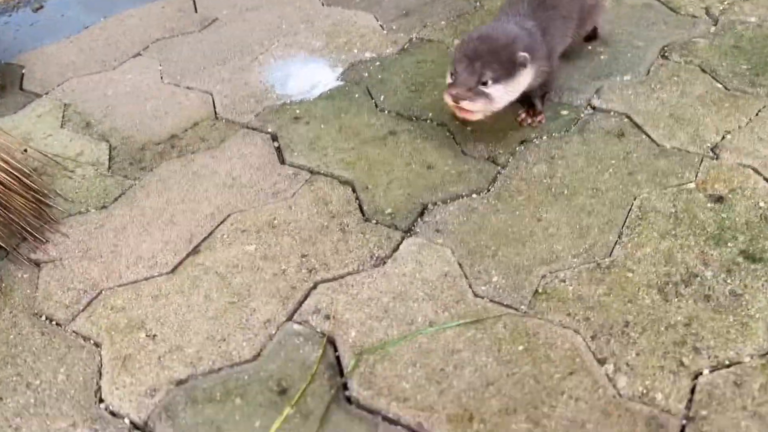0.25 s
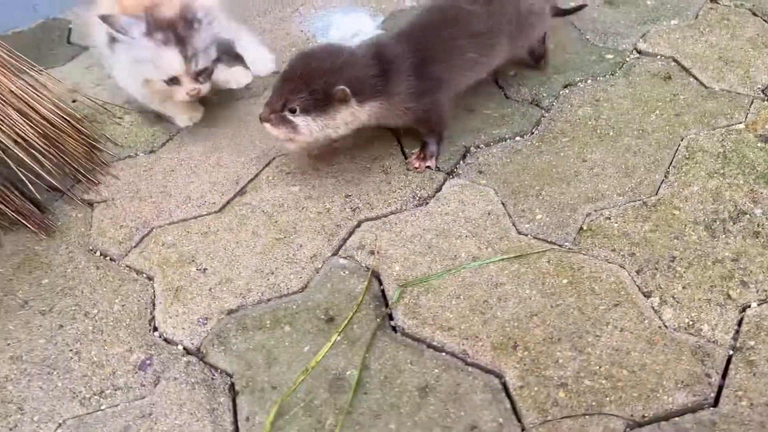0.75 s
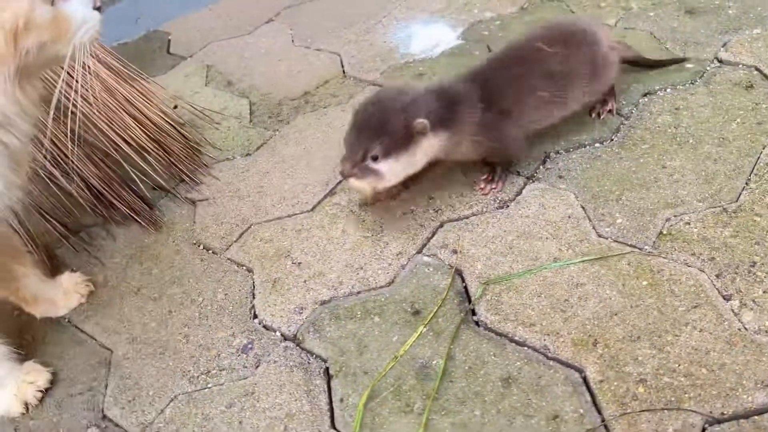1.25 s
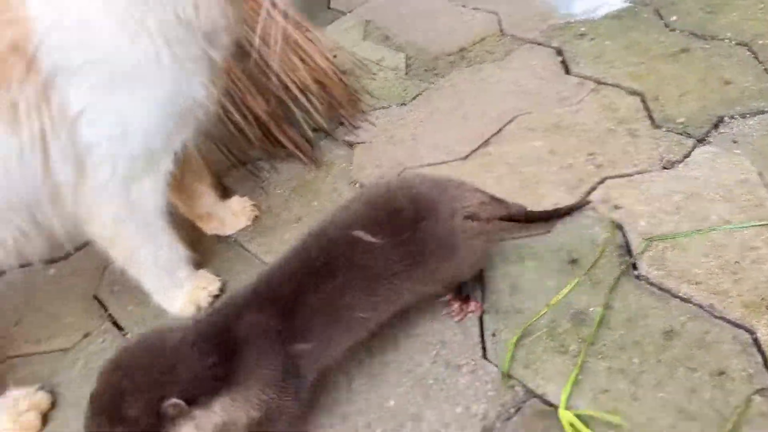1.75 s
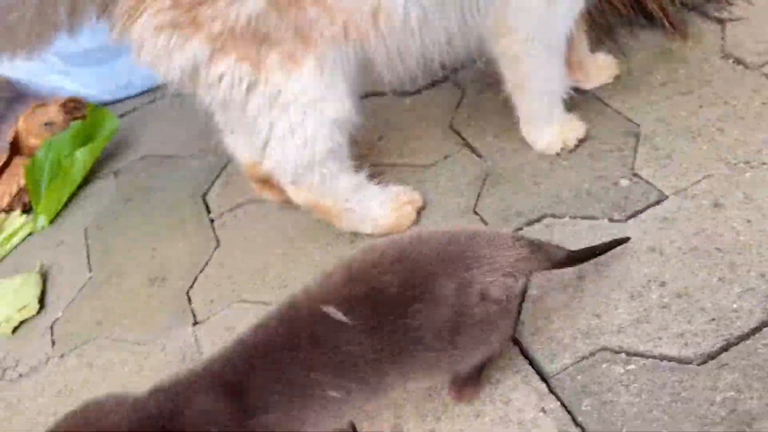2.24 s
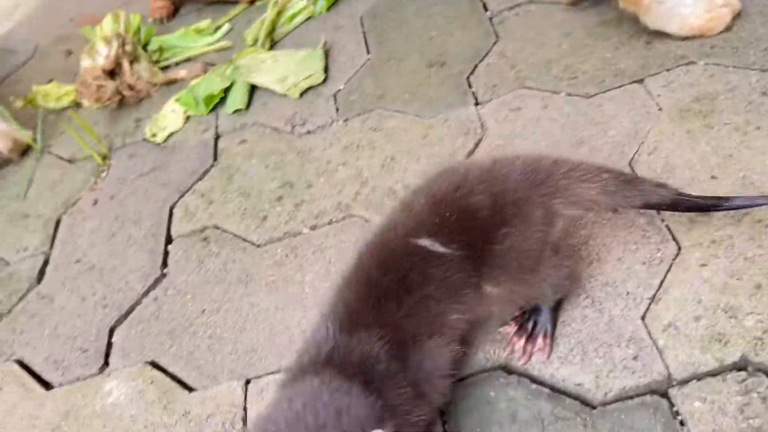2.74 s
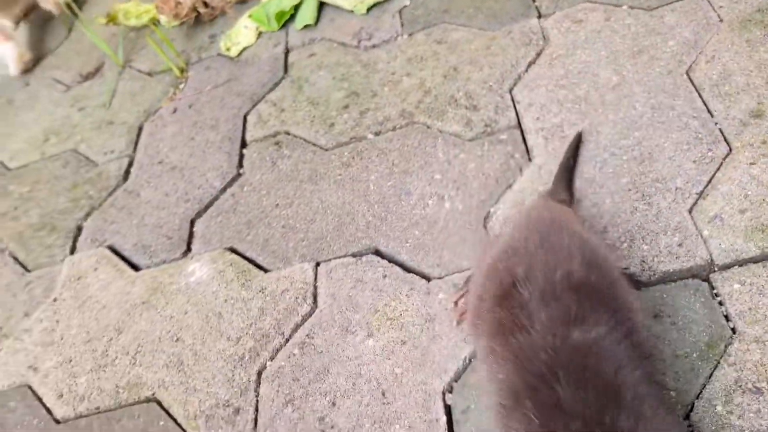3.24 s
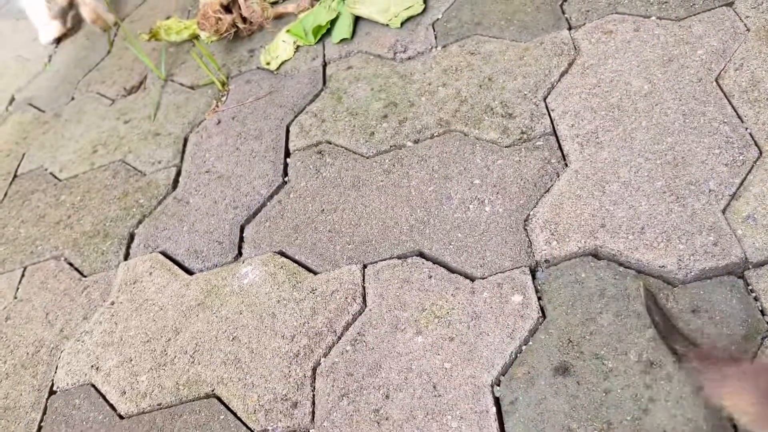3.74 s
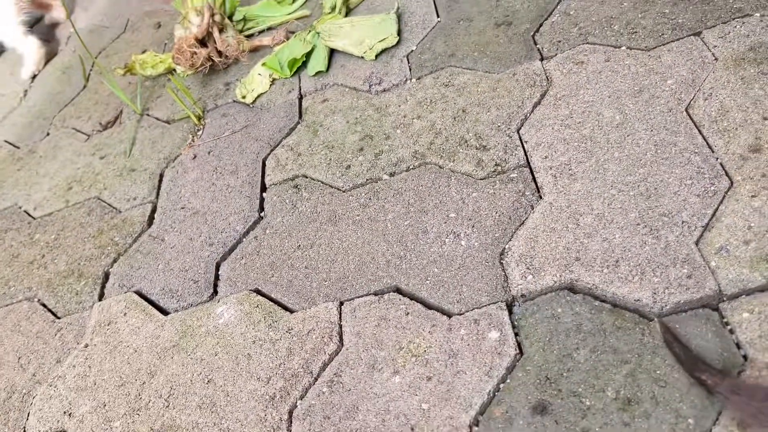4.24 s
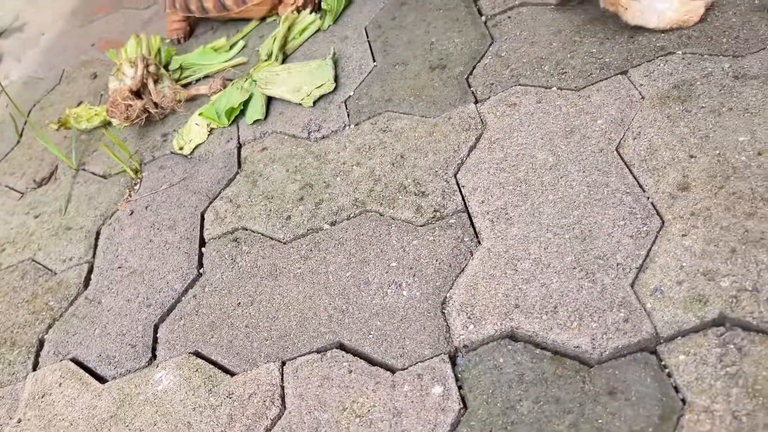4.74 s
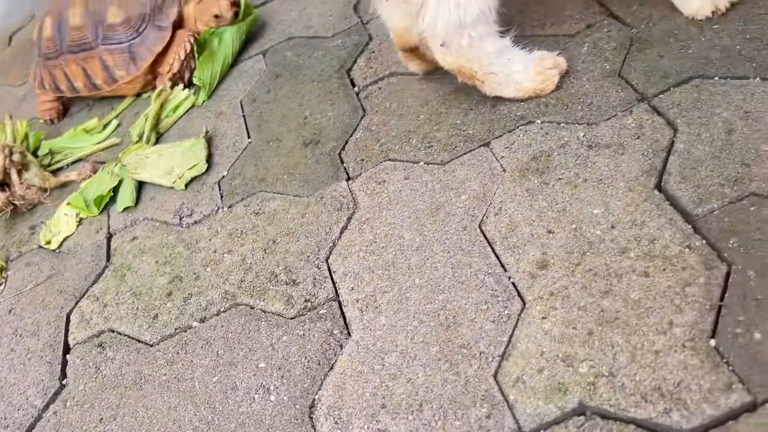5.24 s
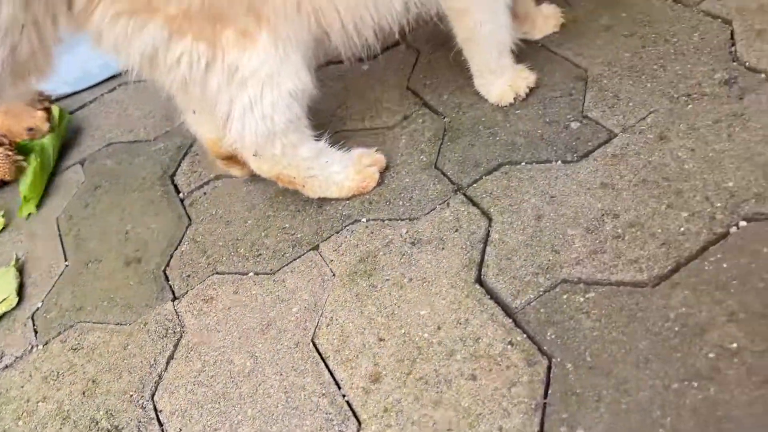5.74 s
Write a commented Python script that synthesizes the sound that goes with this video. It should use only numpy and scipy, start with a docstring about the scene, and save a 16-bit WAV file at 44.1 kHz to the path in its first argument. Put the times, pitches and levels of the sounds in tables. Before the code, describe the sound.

A baby otter gives six short, piercing chirps that slide downward, close by in a paved yard, over faint rumble and small taps.

```python
"""A low outdoor rumble, a far hum and a faint patchy wash (shaped noise and wavering sines) lie under a paved yard.
From the start there are short taps, soft pops, scuffs, rustles and grit close by: bands of noise that fade.
A baby otter chirps six times near the microphone, an arching sine with its octave that flutters and briefly dips;
stones and walls answer each chirp with echoes and a noise-like tail.
The rumble surges twice between the third and fourth chirps; the last chirp is softest, with most echo and ring."""
import sys
import numpy as np
from scipy import signal
from scipy.fft import rfft, irfft, next_fast_len
from scipy.io import wavfile
from scipy.ndimage import uniform_filter1d, minimum_filter1d

SR = 44100
rng = np.random.default_rng(int(sys.argv[2]) if len(sys.argv) > 2 else 0)


def master(y):
    """Save y as 16-bit WAV."""
    cut = np.clip(np.atleast_2d(y).T, -1, 1)
    pcm = np.round(cut * 32767)  # scale
    wavfile.write(sys.argv[1], SR, pcm.astype(np.int16))


N = 263718
EDGE_HZ = 16100  # upper band limit at the microphone


def amp(db):
    """Decibels to gain."""
    return 10 ** (np.asarray(db) / 20)


def unit(x):
    """Scales to rms 1."""
    return x / np.sqrt(np.mean(x ** 2) + 1e-20)


def read(points, hz):
    """Reads a table on a log-frequency axis."""
    f, value = np.transpose(points)
    return np.interp(np.log(hz + 1), np.log(f + 1), value)


def add(mix, s, sound):
    """Mixes a sound in at time s."""
    part = mix[max(round(s * SR), 0):][:len(sound)]
    part += sound[:len(part)]


def colour(x, gain):
    """Filters by a gain given as a function of frequency."""
    size = next_fast_len(len(x) + 1024)
    hz = np.fft.rfftfreq(size, 1 / SR)
    return irfft(rfft(x, size) * gain(hz), size)[:len(x)]


def noise(size, gain):
    """Coloured noise of rms 1."""
    return unit(colour(rng.standard_normal(size), gain))


def hump(hz, octaves):
    """A bell-shaped band on the octave scale."""
    return lambda f: 1 / (1 + (np.log2((f + 1) / hz) / octaves) ** 2) ** 2


def wander(size, rate_hz):
    """Smooth random motion of rms 1, up to about the given rate."""
    return noise(size, lambda f: np.exp(-(f / rate_hz) ** 2))


# Colour of the open air around the yard. Each row: frequency in Hz, relative density in dB.
AIR_COLOUR = [(15, -66.5), (25, -34.5), (59, -6.5), (87, -1.5), (120, -6), (195, -6.5), (416, -21.5),
              (476, -18), (531, -26), (1650, -25), (2990, -31.5), (3720, -31), (6050, -39), (11900, -41),
              (16000, -48)]
# Swells of the distant rumble. Each row: centre in seconds, rise in dB, half length in seconds.
RUMBLE_SURGES = [(1.74, 3.501, 0.14), (2.42, 3.5, .2)]
# Course of the faint wash. Each row: time in seconds, level in dB before the overall lift.
WASH_COURSE = [(0, -66), (.45, -67), (.75, -60.5), (1.15, -66.5), (2.2, -66), (2.5, -60.5), (3.05, -67),
               (3.45, -62.5), (4.25, -70), (5.15, -66), (5.4, -61.5), (5.98, -61)]
# Hum of a far machine. Each row: frequency in Hz, level in dB.
FAR_HUM = [(88, -64), (200, -67.5), (262, -69)]


def outdoors(rumble_db=-55.0, swell_db=0.73, wash_lift_db=1, split_hz=400, patchy_db=1.8):
    """Low noise makes the rumble, wavering sines the hum; octave bands swelling separately make the wash."""
    t = np.arange(N) / SR
    low = lambda f: 1 / np.sqrt(1 + (f / split_hz) ** 8)
    surge_db = sum(db * np.exp(-((t - s) / half_s) ** 2) for s, db, half_s in RUMBLE_SURGES)
    rumble = noise(N, lambda f: amp(read(AIR_COLOUR, f)) * low(f))
    rumble *= amp(rumble_db + surge_db + swell_db * wander(N, 4))
    wash = np.zeros(N)
    for octave in range(6):
        # overlapping bands an octave apart, all above the rumble
        overlap = lambda f: np.clip(1 - abs(np.log2((f + 1) / split_hz) - octave), 0, 1)
        band = lambda f: np.sqrt(overlap(f) * (1 - low(f) ** 2))
        hiss = colour(rng.standard_normal(N), lambda f: amp(read(AIR_COLOUR, f)) * band(f))
        wash += hiss * amp(patchy_db * wander(N, 12))
    wash = unit(wash) * amp(wash_lift_db + np.interp(t, *np.transpose(WASH_COURSE)))
    hum = sum(amp(db) * unit(np.sin(2 * np.pi * hz * t + 1.5 * wander(N, 7.8))) for hz, db in FAR_HUM)
    return rumble + wash + hum


# How long the yard rings. Each row: frequency in Hz, time to fall 60 dB in seconds.
YARD_DECAY = [(500, 0.02), (4000, 0.69), (6500, 0.667), (8500, 0.53), (12000, 0.63), (16000, 0.35)]
# Colour of that ring. Each row: frequency in Hz, relative level in dB.
YARD_TINT = [(500, -2), (3500, 0), (5000, -2.5), (6500, 0.5), (7500, -1), (8500, -1.5), (9500, 0.5),
             (12000, 1.5), (16000, 2)]


def yard(x, rise_s=.012):
    """The walls return a diffuse tail: noise that builds quickly and decays at its own rate in each band."""
    hz, t, bands = signal.stft(rng.standard_normal(SR), SR, nperseg=256)
    decay_db = -60 * t / read(YARD_DECAY, hz)[:, None]
    bands = bands * amp(read(YARD_TINT, hz)[:, None] + decay_db)
    tail = signal.istft(bands, SR, nperseg=256)[1]
    tail *= 1 - np.exp(-np.arange(len(tail)) / SR / rise_s)
    return signal.fftconvolve(x, tail / np.linalg.norm(tail))[:N]


def sand(per_s=22, softest_db=-66, spread_db=4.5, t60=.02):
    """Loose grit ticks faintly: short decaying noise bands at random times, pitches and strengths."""
    out, t = np.zeros(N), np.arange(1500) / SR
    for when, pitch, chance in rng.random((int(per_s * N / SR), 3)):
        tick = noise(len(t), hump(900 * 8 ** pitch, 1.1)) * amp(-60 * t / t60)
        # small draws, which are rare, make the loudest ticks
        add(out, when * N / SR, tick * amp(softest_db - spread_db * np.log(max(chance, .04))))
    return out


# Short taps and soft pops, some at the ends of chirps, with short dull low bursts near the end of chirp one
# and at chirp four. Each row: start in seconds, peak in dB, centre in Hz, time to fall 60 dB in seconds.
SHORT_TAPS = [(.076, -44.5, 1190, .03), (.153, -37, 500, .03), (0.234, -32, 900, .015),
              (.253, -26, 1300, .03), (0.283, -37, 2800, .03), (.42, -45.5, 2200, .025),
              (0.465, -46, 750, .04), (.518, -46, 1400, .025), (.691, -49, 9000, .015),
              (1.305, -46.5, 8000, .03), (1.903, -46, 5000, .02), (2.056, -47, 3000, .015),
              (2.113, -42.5, 4800, 0.019), (2.921, -29, 40, 0.06), (2.921, -27.5, 800, 0.031),
              (2.928, -26, 900, .025), (3.02, -34.5, 1800, .03), (3.483, -39, 1600, 0.013),
              (3.517, -36, 1500, .018), (3.815, -27, 3700, .012), (3.817, -35, 330, .035),
              (3.83, -35, 1700, .04), (3.977, -24, 2000, 0.022), (5.513, -39.5, 3000, 0.054),
              (5.918, -39.5, 2600, 0.022)]
# Scuffs and rustles, long low swells of rumble, and a breathy, ragged noise at the end of the last chirp.
# Each row: start in seconds, length in seconds, level in dB, centre in Hz, width in octaves.
FADING_NOISES = [(0.102, 0.24, -58, 1100, 0.46), (0.5, 0.5, -68, 800, 1.16), (1.489, 0.21, -63.5, 650, 1.2),
                 (1.66, 0.48, -64, 550, 0.9), (1.864, 0.4, -70.5, 7000, 1.5), (2.1, 1.78, -60.5, 170, 0.6),
                 (3.55, 0.9, -64, 190, 0.7), (2.378, 0.56, -55.5, 850, 1.4), (2.39, 0.47, -59, 2594, 1.9),
                 (2.41, 0.18, -61.5, 10000, 1.2), (3.271, 0.51, -62, 1900, 1.2),
                 (3.483, 0.13, -67, 10070, 1.35), (4.621, 0.3, -73, 2210, 1.22),
                 (4.96, 0.071, -68, 11100, 1.06), (5.182, 0.31, -72, 3600, 0.7),
                 (5.352, 0.15, -66.5, 8030, 2), (5.5, 0.11, -56, 5980, 2.8),
                 (5.849, 0.14, -56.5, 4200, 0.89)]


def small_sounds(tap_octaves=1.6, grit=.25):
    """Taps and pops are decaying noise bursts; scuffs, rustles and swells are gritty bands that rise fast and fade."""
    out = np.zeros(N)
    t = np.arange(3000) / SR
    for s, db, hz, t60 in SHORT_TAPS:
        tap = noise(len(t), hump(hz, tap_octaves)) * amp(-60 * t / t60)
        add(out, s, amp(db) * tap / abs(tap).max())
    for s, length, db, hz, octaves in FADING_NOISES:
        u = np.linspace(0, 1, int(length * SR))
        roughness = np.exp(grit * wander(N, 250)[:len(u)])
        grains = rng.standard_normal(len(u)) * roughness
        stroke = np.minimum(u / 0.064, 1) * (1 - u) ** 2
        add(out, s, amp(db) * unit(colour(grains, hump(hz, octaves)) * stroke))
    return out


def near_echoes(ground_s=.0019, ground=.6, t60=0.2, count=70):
    """One bounce off the paving and weak scatter off nearby things; delays are drawn afresh for each chirp."""
    taps = np.zeros(SR // 10)
    delay = rng.uniform(.004, .05, count)
    taps[(delay * SR).astype(int)] = rng.choice([-1, 1], count) * amp(-60 * delay / t60)
    taps /= np.linalg.norm(taps)
    taps[int(SR * ground_s * rng.uniform(.85, 1.15))] += ground
    return taps


LEAP_HZ, LEAP_S, DROP_S = 900, .004, .002  # pitch leaps up as the voice starts and drops as it stops


def arch(t, length, open_hz, top_hz, top_s, end_hz, drop_hz):
    """The pitch of a chirp: a leap, two half parabolas that meet at the top, and a last drop."""
    leap = LEAP_HZ * np.exp(-t / LEAP_S)
    drop = drop_hz * np.exp((t - length) / DROP_S)
    rise = (top_hz - open_hz - LEAP_HZ) * np.clip(1 - t / top_s, 0, 1) ** 2
    fall = (top_hz - end_hz) * np.clip((t - top_s) / (length - top_s), 0, 1) ** 2
    return top_hz - leap - rise - fall - drop


SWELL_S, SAG_POWER, RELEASE_DB = .0018, 3.0, 3  # sudden swell, late sag, fade with the last drop


def effort(t, length, open_db, swell_s, full_db, end_db):
    """The level of a chirp in dB: a soft opening, a sudden swell, a hold that sags late, a quick release."""
    swell = (1 + np.tanh((t - swell_s) / (2 * SWELL_S))) / 2
    hold_db = full_db + (end_db - full_db) * (t / length) ** SAG_POWER
    release_db = RELEASE_DB * np.exp((t - length) / DROP_S)
    return open_db * (1 - swell) + swell * hold_db - release_db


# Brief dips in level where the direct sound and its ground bounce cancel. Each row: deepest point in seconds,
# depth in dB, time to sink in seconds, pitch shift during the dip in Hz.
PATH_DIPS = [(.215, 14.5, .015, 380), (.75, 7.5, .01, 150), (.774, 13, .002, -100), (.795, 18.5, .006, 50),
             (1.497, 11, .004, 0), (1.513, 1, .007, 450), (1.533, 9.5, .02, 0), (1.579, 10, .004, -400),
             (2.909, 5, 0.0039, 150), (2.986, 8.5, .021, 110), (3.721, 7, .002, 470),
             (3.787, 10.5, .008, 0)]
RETURN_S = .0025  # the level rises out of each dip in this time


def path_dips(t):
    """How many dB are lost in the dips of the direct path, and how many Hz the pitch shifts there."""
    s, db, sink_s, shift_hz = np.transpose(PATH_DIPS)
    since = t[:, None] - s
    dip = np.exp(-(since / np.where(since < 0, sink_s, RETURN_S)) ** 2)
    return dip @ db, dip @ shift_hz


# Colour of the hiss in the voice. Each row: frequency in Hz, relative level in dB.
BREATH_COLOUR = [(500, -20), (2400, -20.5), (3400, -8), (4300, -12), (5600, -15), (7500, -8.5), (9300, -1),
                 (11500, -5.5), (14000, -2), (16000, -4)]
UNDER_GROWTH_DB = 9  # over a chirp the low second tone grows by this much against the whistle
OCTAVE_KEPT, UNDER_KEPT = .4, 0.64  # share of a dip that the octave and the second tone escape


def chirp(row, flutter_s, flutter, overtone_db, under_db, rasp_db, hiss_db, snap,
          flutter_hz=490, jitter=.008, third_db=-27, snap_s=0.0026):
    """A whistling voice with overtones; returns start time, sound ahead of the mouth, sound sent all around."""
    start, length, *shape = row
    pitch_shape, level_shape = shape[:5], shape[5:]
    age = np.arange(0, length, 1 / SR)
    t, size = start + age, len(age)
    lost_db, shift_hz = path_dips(t)
    hz = arch(age, length, *pitch_shape) + shift_hz
    db = effort(age, length, *level_shape) - lost_db
    loud = amp(db)
    high = np.clip((hz - 6000) / 2000, 0, 1)  # the throat is strained at the top of the arch
    soft_boost = np.clip((db.max() - db) / 7, .8, 1.6)  # the flutter is deeper where the level is lower
    flutter_onset = np.clip((t - flutter_s) / .005, 0, 1)
    depth = np.clip(flutter * high * soft_boost * flutter_onset, 0, .6)
    # a second, slow vibration chops the whistle, which adds a ladder of side tones above it
    throb_hz = flutter_hz * (1 + .2 * wander(size, 110))
    throb = np.exp(2j * np.pi * np.cumsum(throb_hz) / SR)
    chop = np.sqrt(1 - depth ** 2) / (1 - depth * throb)
    cycle = np.exp(2j * np.pi * np.cumsum(hz * (1 + jitter * wander(size, 700))) / SR)
    # the octave is strongest near 12 kHz and in the snap with which the voice starts
    octave_response = [(8000, -17.5), (10000, -5), (12500, 1), (15000, -2), (16500, -10)]  # (Hz, dB)
    octave = amp(overtone_db + OCTAVE_KEPT * lost_db + read(octave_response, 2 * hz))
    octave *= 1 + snap * np.exp(-age / snap_s)
    # rasp roughens both the level and the phase of the whistle
    rasp = 1 + amp(rasp_db) * (wander(size, 700) + 1j * wander(size, 700)) / np.sqrt(2)
    whistle = cycle * chop * unit(abs(rasp)) * np.exp(1j * np.angle(rasp))
    third = amp(third_db) * (3 * hz < EDGE_HZ) * cycle ** 3
    tone = (whistle + octave * whistle ** 2 + third).imag
    # a faint second tone lies near half the pitch and sags at the top of the arch
    under_hz = hz / 2 - 1.1 * np.maximum(hz - 8100, 0)
    under_level_db = under_db + UNDER_GROWTH_DB * (age / length - .5) + UNDER_KEPT * lost_db
    under_phase = 2 * np.pi * np.cumsum(under_hz) / SR + 1.0 * wander(size, 550)
    tone += amp(under_level_db) * high * np.sin(under_phase)
    # the hiss follows the voice by only half its dB
    hiss = noise(size, lambda f: amp(read(BREATH_COLOUR, f)))
    hiss *= amp(hiss_db) * np.sqrt(loud * loud.max())
    call = (np.sqrt(2) * loud * tone + hiss) * signal.windows.tukey(size, .025)
    # summed over all directions, the voice is steadier than along any one path
    return start, call, call * amp(.75 * lost_db)


# Six arches of pitch close to the microphone. Each row: start in seconds, length in seconds, opening in Hz,
# top in Hz, time to the top in seconds, end before the last drop in Hz, last drop in Hz, opening level in dB,
# time to the swell in seconds, full level in dB, end level in dB.
CHIRP_ARCHES = [(0.124, .125, 6240, 8780, 0.041, 4230, 250, -31, .012, -7.5, -6.5),
                (0.717, .109, 6250, 8720, .031, 4338, 50, -32, 0.0091, -8.5, -12),
                (1.4818, .114, 5346, 8750, .037, 5225, 747, -20.5, .026, -5, -15.5),
                (2.901, .118, 6600, 8530, .03, 4635, 1640, -23, .0098, -5.5, -13.5),
                (3.713, .104, 6070, 8467, .034, 5920, 2930, -27.5, .012, -10.5, -19),
                (5.760, .115, 5400, 8740, .044, 5890, 100, -40.5, 0.02, -20, -25)]
# Voice and surroundings of each chirp. Each row: flutter start in seconds, base flutter depth from 0 to 1,
# octave overtone in dB, low second tone in dB, rasp in dB, hiss in dB, opening snap as a boost of the octave,
# near echoes in dB, yard ring in dB.
CHIRP_VOICES = [(0.142, 0.3, -7.5, -40.5, -13.5, -26.5, 11, -19, -23),
                (.745, .33, -7, -38, -23, -32, 2.1, -14, -20),
                (1.499, 0.25, -10, -31, -12.5, -26, 2.6, -17, -22),
                (2.958, 0.37, -7, -40, -23, -27, 4.5, -20, -22),
                (3.735, 0.31, -10, -35.5, -14.5, -26.5, 1.2, -10, -18.7),
                (5.781, 0.28, -7.5, -39, -5.5, -27, 4, -2, -7)]


def otter():
    """Each chirp arrives directly, off the near surfaces, and as the ring of the yard."""
    near, far = np.zeros((2, N))
    for row, (*voice, echo_db, ring_db) in zip(CHIRP_ARCHES, CHIRP_VOICES):
        s, call, around = chirp(row, *voice)
        add(near, s, call)
        add(near, s, amp(echo_db) * signal.fftconvolve(call, near_echoes()))
        add(far, s, amp(ring_db) * around)
    return near + yard(far)


def scene(small_ring_db=-13):
    """The open air, the small close sounds with their ring, and the otter."""
    small = small_sounds() + sand()
    close_by = small + amp(small_ring_db) * yard(small)
    return (outdoors() + close_by + otter())[None]


def record(dry):
    """A fast limiter holds the peaks under full scale; then the band limit."""
    gain = np.minimum(1, .95 / (abs(dry[0]) + 1e-9))
    gain = uniform_filter1d(minimum_filter1d(gain, size=91), size=91)
    band_limit = signal.firwin(401, EDGE_HZ, window=("kaiser", 9), fs=SR)
    return signal.oaconvolve(dry * gain, band_limit[None], "same")


dry = scene()
out = record(dry)
master(out)
```